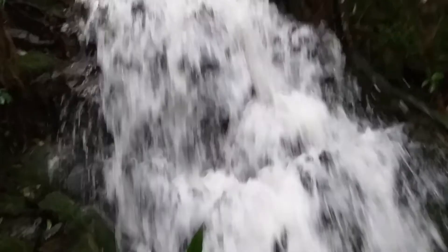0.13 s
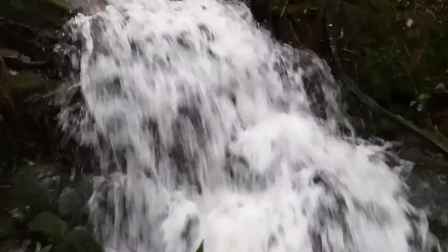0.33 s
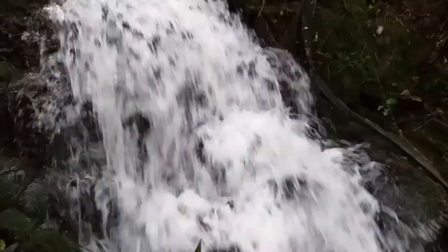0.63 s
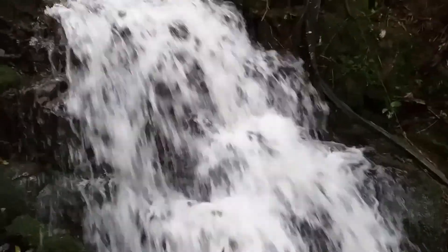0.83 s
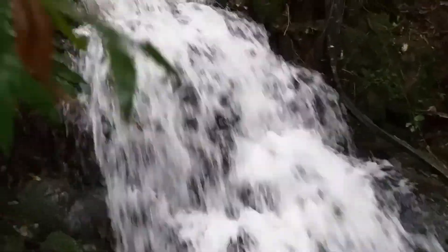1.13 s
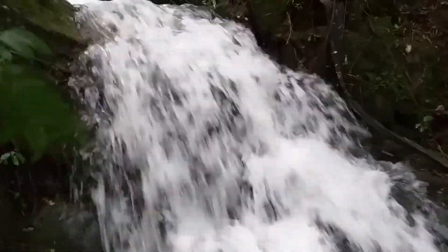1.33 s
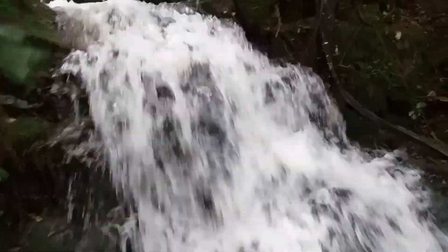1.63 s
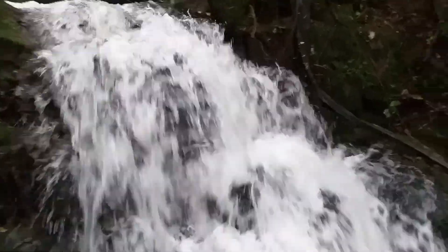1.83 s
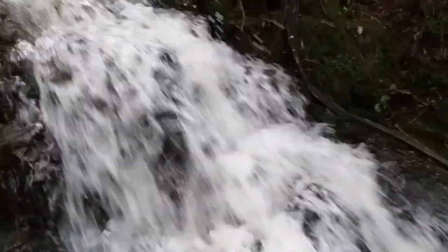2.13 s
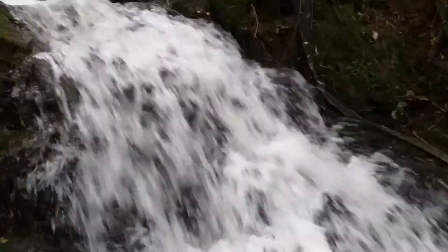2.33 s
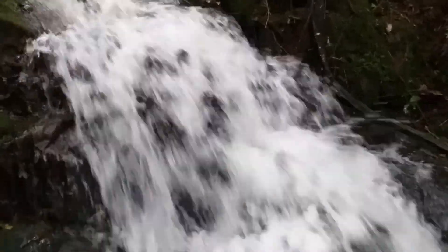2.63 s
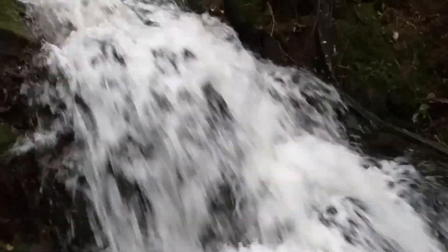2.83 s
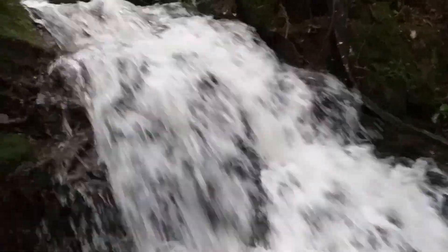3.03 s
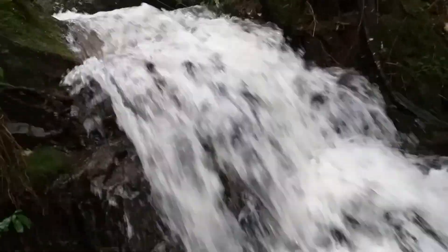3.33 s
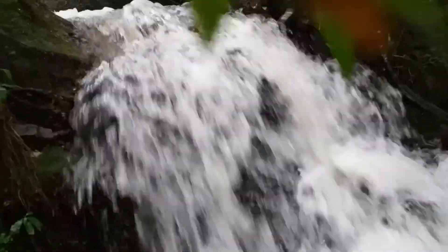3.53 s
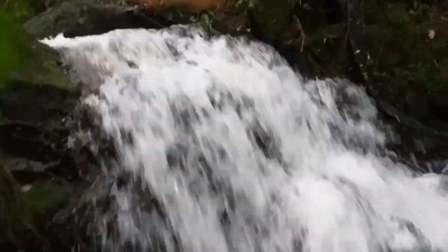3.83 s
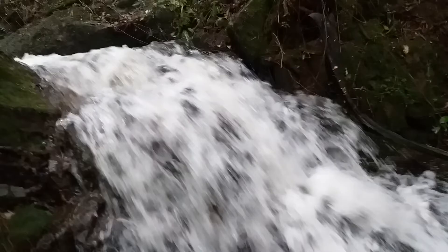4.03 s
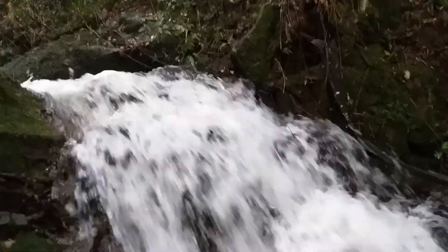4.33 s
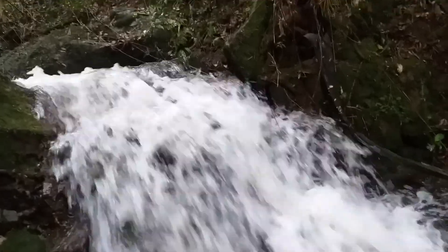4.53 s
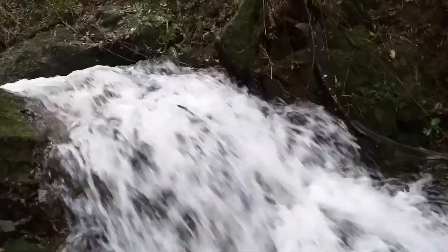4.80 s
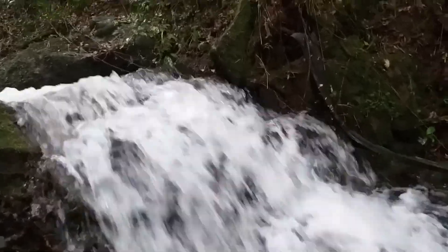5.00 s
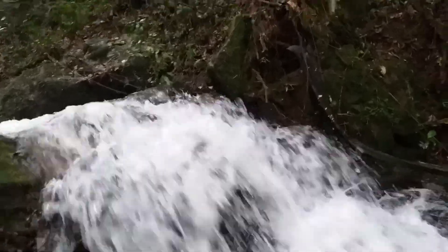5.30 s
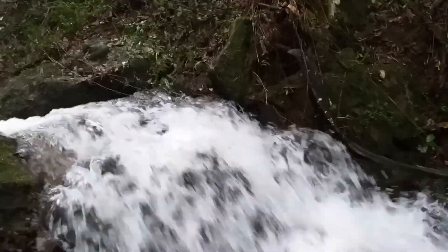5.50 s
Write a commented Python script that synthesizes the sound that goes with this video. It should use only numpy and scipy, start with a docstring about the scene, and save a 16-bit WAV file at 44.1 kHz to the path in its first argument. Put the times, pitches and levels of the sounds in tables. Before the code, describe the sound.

For about 5.7 seconds a small forest waterfall rushes over rocks close to a hand-held recorder. It is already in full flow at the start and ends without fading. The sound is a dense, broad roar, strongest from roughly 700 Hz to 2 kHz, with plenty of bright hiss above, thin deep bass and a cut-off extreme top. Countless tiny bubbles blur into a gurgling texture, and droplets patter in fast, fine showers. The first second is slightly quieter; a short gush near 1.05 s brings the level up, and another comes near 1.95 s. Small bubbling swells follow around 2.8, 3.1 and 3.3 s. A brief dip at 4.4 s leads into a gush just before 4.6 s, and a last one comes at 5.5 s. Tiny water slaps tick at about 1.2, 2.0, 3.8 and 5.1 s, among others. Dry, central, almost mono, with only slight tonal differences between sides.

```python
"""Small forest waterfall

A small waterfall in a forest tumbles over rocks, heard from close by on a hand-held recorder.
White water rushes in surges as banded noise; trapped air rings as countless decaying sines.
Spray patters as random clicks, and lumps of water slap the stone with very short rings.
The sound is almost mono: each microphone adds only the port resonance of its own side."""
import sys
import numpy as np
from scipy import signal
from scipy.fft import rfft, irfft, next_fast_len
from scipy.io import wavfile

SR = 44100
rng = np.random.default_rng(int(sys.argv[2]) if len(sys.argv) > 2 else 0)


def unload_wav(signal):
    """Save mono or channel-first audio to the path in sys.argv[1] as 16-bit WAV at rate SR, clipped to [-1, 1]."""
    wavfile.write(
        sys.argv[1],
        SR,
        np.round(np.clip(np.atleast_2d(signal).T, -1, 1) * 32767).astype(np.int16),
    )


N = 249606
TIME_S = np.arange(N) / SR
BINS_HZ = np.arange(N // 2 + 1) * SR / N

# Where each part of the fall dominates, in Hz
CHURN_HZ, BUBBLING_HZ, SPRAY_HZ = 830, 1800, 3600


def from_db(db):
    """Decibels to gain."""
    return 10 ** (np.asarray(db) / 20)


def rms_one(x):
    """Scale to unit rms."""
    return x / np.sqrt(np.mean(x ** 2) + 1e-20)


def drift(rate_hz):
    """Slow chance with unit rms: noise low-passed by two equal poles at `rate_hz`."""
    step = 40  # samples between the computed points
    warm_up = 2000
    pole = np.exp(-2 * np.pi * rate_hz * step / SR)
    noise = rng.standard_normal(N // step + 2 + warm_up)
    slow = signal.lfilter([1], [1, -2 * pole, pole * pole], noise)[warm_up:]
    return np.interp(np.arange(N) / step, np.arange(len(slow)), rms_one(slow))


def ring(clicks, hz, t60_s):
    """A unit click sets a sine of height about 1 ringing, 60 dB down after `t60_s`."""
    radius = from_db(-60 / (t60_s * SR))
    angle = 2 * np.pi * hz / SR
    poles = [1, -2 * radius * np.cos(angle), radius * radius]
    # the tiny offset keeps the filter from slowing down in silence
    return signal.lfilter([.5, 0, -.5], poles, clicks + 1e-18)


def impacts(per_s, spread_db):
    """Random clicks of either sign, many small and a few large."""
    sizes = from_db(spread_db * np.minimum(rng.exponential(1, N), 4))
    signs = rng.choice([-1, 1], N)
    lands = rng.random(N) < per_s / SR
    return sizes * signs * lands


def rush(patchy_db, patchy_hz, count=18):
    """Foam too fine to resolve: half-octave bands of noise, each swelling on its own."""
    edges_hz = np.geomspace(40, 18000, count + 1)
    # the first and last bands also take everything beyond the outer edges
    band = np.searchsorted(edges_hz[1:-1], BINS_HZ)
    white = rfft(rng.standard_normal(N))
    foam = np.zeros(N)
    for k in range(count):
        foam += irfft(white * (band == k), N) * from_db(patchy_db * drift(patchy_hz))
    return rms_one(foam)


def bubbles(per_s, cycles, spread_db, clump_db, count=64):
    """Air pockets ring for some cycles as they close; small ones are more numerous, all in clouds."""
    out = np.zeros(N)
    cloud = from_db(clump_db * drift(12))
    for hz in np.geomspace(170, 9000, count):
        births = impacts(per_s * cloud * hz / BUBBLING_HZ / count, spread_db)
        out += np.sqrt(hz) * rms_one(ring(births, hz, cycles / hz))
    return rms_one(out)


def spray(per_s, spread_db, clump_db, clump_hz):
    """Droplets patter on wet rock as bare clicks, in quick showers."""
    showers = from_db(clump_db * drift(clump_hz))
    return rms_one(impacts(per_s * showers, spread_db))


# Lumps of water hitting rock close to the microphone.
# Each row: start in seconds, pitch in Hz, level in dB.
SLAPS = [(1.220, 7700, 0), (1.999, 3800, -3), (2.276, 1800, -8), (2.791, 1800, -8), (3.317, 1850, -7),
         (3.603, 3200, -7), (3.797, 4900, 1), (4.281, 7300, -6), (5.075, 3500, -6)]


def slaps(cycles):
    """A lump of water bursts on stone with a very short ring, 60 dB down after `cycles`."""
    out = np.zeros(N)
    for start_s, hz, db in SLAPS:
        click = np.arange(N) == round(start_s * SR)
        out += ring(from_db(db) * click, hz, cycles / hz)
    return out


# Deep rumble of the plunge pool at the foot of the fall, and the wash above it.
# Each row: frequency in Hz, gain in dB.
POOL = [(25, -47), (48, -38.5), (72, -21), (95, -19.5), (128, -5), (170, -8), (250, -6), (340, -2),
        (430, -3.5), (720, 2.5), (1000, 1.5)]
# Brightness of the falling sheet, continuing upward from the pool.
# Each row: frequency in Hz, gain in dB.
SHEET = [(1300, 3), (1880, 4.5), (2650, -0.5), (3400, 1.15), (3900, -1.44), (4800, -0.25), (6000, -2.5),
         (7300, 0.96), (8500, -1.2), (9800, -11.5), (11000, -10.5), (12500, -5), (15700, -7)]


def pool_and_sheet(water):
    """The pool shapes the low spectrum and the sheet the high, joined on a log-frequency line."""
    hz, gain_db = np.transpose(POOL + SHEET)
    size = next_fast_len(N + SR // 10)
    bins_hz = np.maximum(np.arange(size // 2 + 1) * SR / size, 1)
    gain = from_db(np.interp(np.log(bins_hz), np.log(hz), gain_db))
    return irfft(rfft(water, size) * gain, size)[:N]


# The biggest gushes at the rocks, and lulls where the whole-fall figure is negative.
# Each row: centre in seconds, length in seconds, change of the whole fall in dB,
# further change of its bubbling in dB.
GUSHES = [(1.047, .12, 1.6, 2), (1.96, 0.14, 1, .8), (2.78, .1, 0.3, 2), (3.074, .1, 0.3, 1.5),
          (3.326, 0.11, 0, 1), (4.44, 0.1, -2.5, 0), (4.575, .1, 1.5, -1), (5.523, 0.092, 1.1, 1.8)]


def gushes():
    """Each gush swells and ebbs as a squared cosine: dB for the whole fall and for its bubbling."""
    whole, bubbling = np.zeros(N), np.zeros(N)
    for centre_s, length_s, whole_db, bubbling_db in GUSHES:
        swell = np.cos(np.pi * np.clip((TIME_S - centre_s) / length_s, -.5, .5)) ** 2
        whole += whole_db * swell
        bubbling += bubbling_db * swell
    return whole, bubbling


# Slow level of the whole fall at the recorder, a little quieter in the first second.
# Each row: time in seconds, level in dB.
LOUDNESS = [(0, -16.5), (.7, -16), (1.0, -14.5), (1.65, -14.5), (2.0, -14.5), (3.3, -14), (4.2, -14.5),
            (5.66, -14.3)]
# Level of each part against the whole fall, in dB
CHURN_DB, BUBBLING_DB, SPRAY_DB = -0.52, 2.5, 2.5
# Random unevenness of the whole flow: rms in dB, rate in Hz
SURGE_DB, SURGE_RATE_HZ = 0.12, 13
# Each part's own unevenness: rms in dB, shared rate in Hz
CHURN_FLUTTER_DB, BUBBLING_FLUTTER_DB, SPRAY_FLUTTER_DB, FLUTTER_RATE_HZ = 0.46, 0.1, 0.32, 22


def surging(water):
    """Churn, bubbling and spray bands follow one uneven flow, and each flutters a little on its own."""
    gush_db, bubbling_gush_db = gushes()
    slow_db = np.interp(TIME_S, *np.transpose(LOUDNESS))
    flow_db = slow_db + gush_db + SURGE_DB * drift(SURGE_RATE_HZ)
    churn_db = CHURN_DB + CHURN_FLUTTER_DB * drift(FLUTTER_RATE_HZ)
    bubbling_db = BUBBLING_DB + BUBBLING_FLUTTER_DB * drift(FLUTTER_RATE_HZ) + bubbling_gush_db
    spray_db = SPRAY_DB + SPRAY_FLUTTER_DB * drift(FLUTTER_RATE_HZ)

    log_bins = np.log(np.maximum(BINS_HZ, 1))
    centres = np.log([CHURN_HZ, BUBBLING_HZ, SPRAY_HZ])
    spectrum, out = rfft(water), np.zeros(N)
    # neighbouring parts crossfade between their centres; their shares add up to one
    for share, level_db in zip(np.eye(3), [churn_db, bubbling_db, spray_db]):
        part = irfft(spectrum * np.interp(log_bins, centres, share), N)
        out += part * from_db(flow_db + level_db)
    return out


def scene():
    """Foam, bubbles, spray and slaps come from one place straight ahead."""
    foam = from_db(-3.0) * rush(patchy_db=.5, patchy_hz=6.3)
    ringing = from_db(-8) * bubbles(per_s=9000, cycles=35.0, spread_db=3.5, clump_db=1.65)
    patter = from_db(-5.5) * spray(per_s=11000, spread_db=2.5, clump_db=2.5, clump_hz=42)
    fall = pool_and_sheet(foam + ringing + patter)
    water = surging(fall) + slaps(cycles=18)
    return np.array([water, water])


# Port resonances of the hand-held recorder's microphones, left then right.
# Each row: frequency in Hz, Gaussian half-width in Hz, lift in dB.
PORTS = [(1943, 210, 4), (9700, 216, 5)]
CUTOFF_HZ = 15720


def record(dry):
    """Each port lifts one narrow band of its own side; a steep low-pass cuts the top."""
    sides = []
    for side, (hz, width_hz, db) in zip(dry, PORTS):
        detune = (BINS_HZ - hz) / width_hz
        lift_db = db * np.exp(-detune ** 2 / 2)
        # the imaginary part makes the phase lead below a resonance and lag above it
        port = from_db(lift_db * (1 - 1j * detune))
        sides.append(irfft(rfft(side) * port, N))
    low_pass = signal.ellip(14, .1, 90, CUTOFF_HZ, fs=SR, output="sos")
    return signal.sosfilt(low_pass, sides)


dry = scene()
out = record(dry)
unload_wav(out)
```